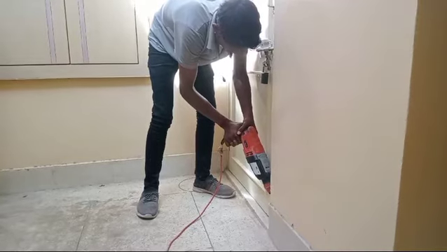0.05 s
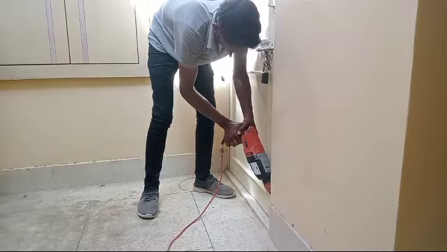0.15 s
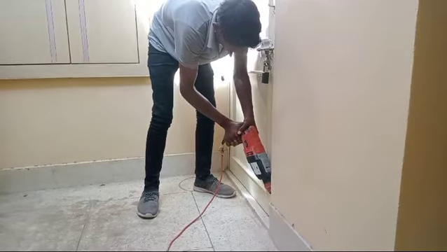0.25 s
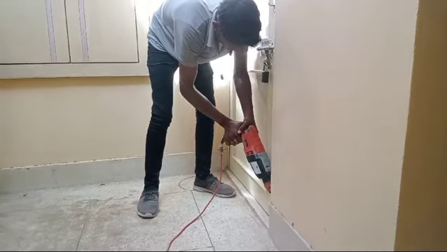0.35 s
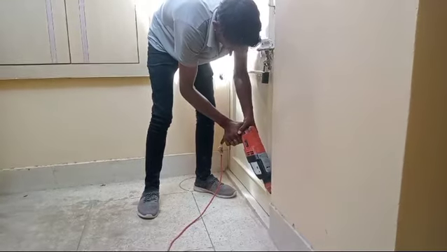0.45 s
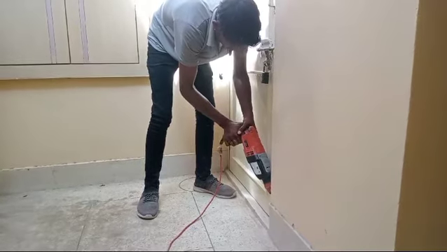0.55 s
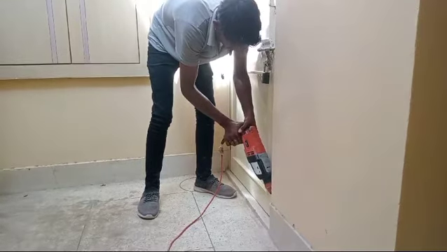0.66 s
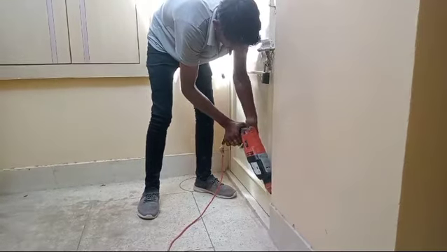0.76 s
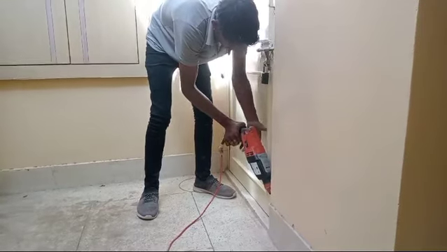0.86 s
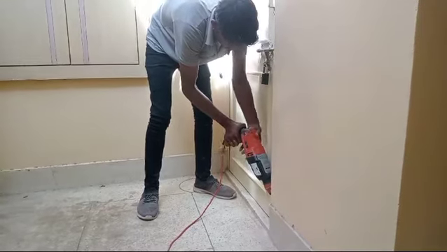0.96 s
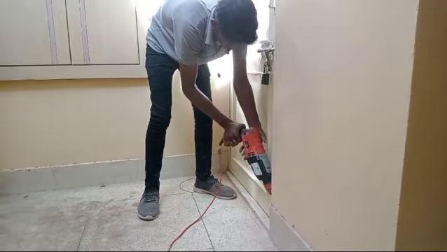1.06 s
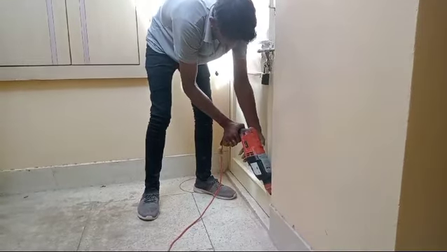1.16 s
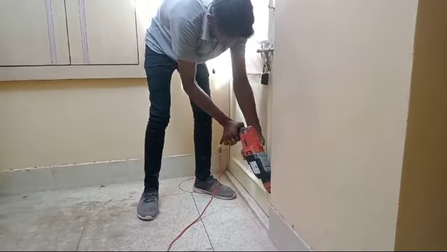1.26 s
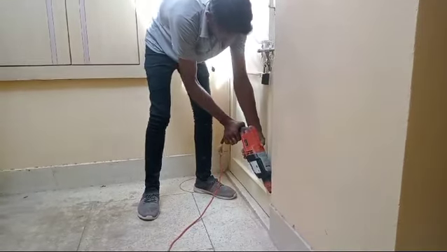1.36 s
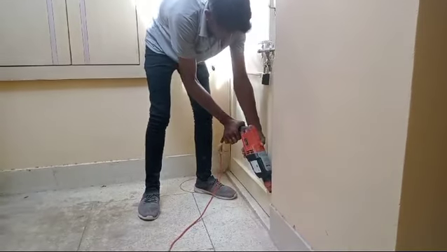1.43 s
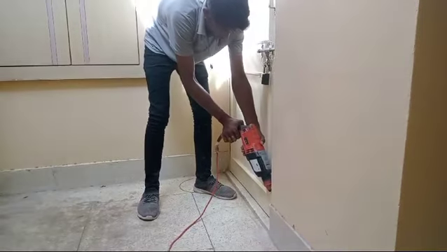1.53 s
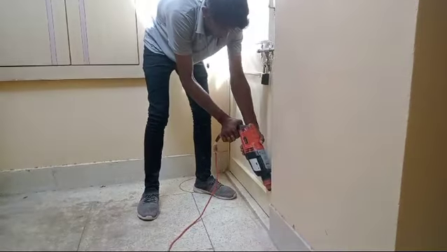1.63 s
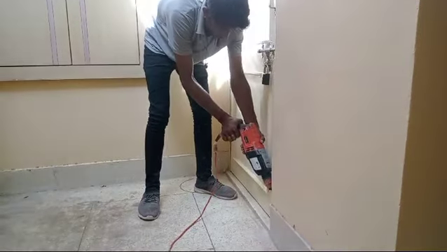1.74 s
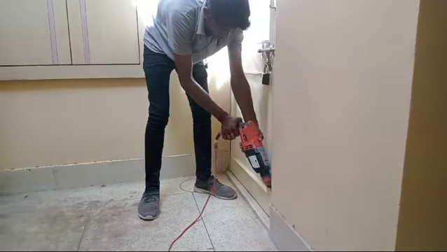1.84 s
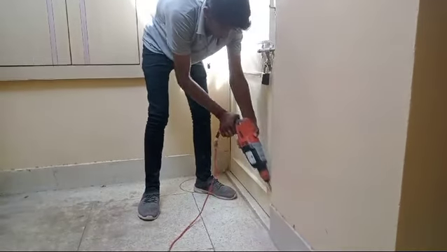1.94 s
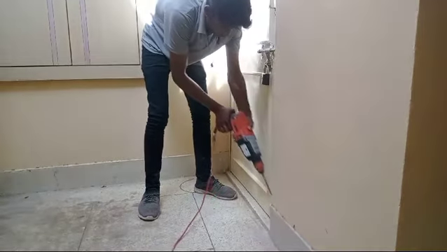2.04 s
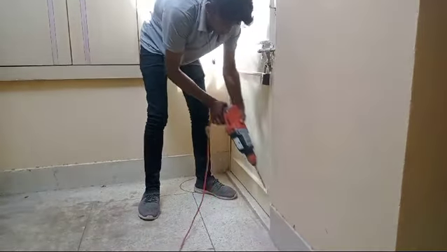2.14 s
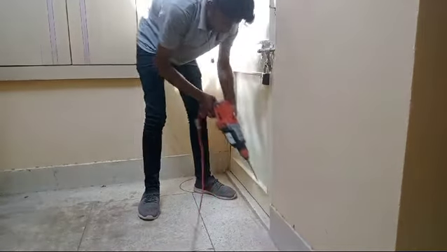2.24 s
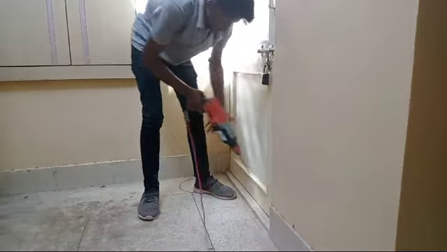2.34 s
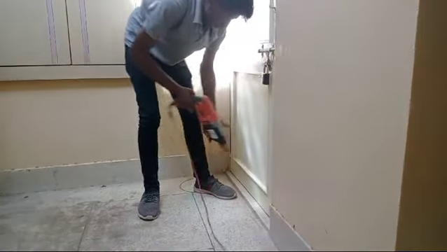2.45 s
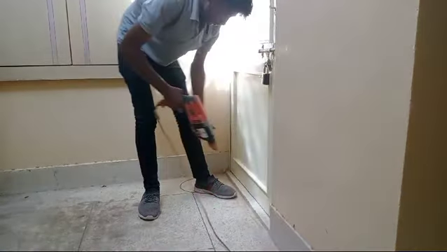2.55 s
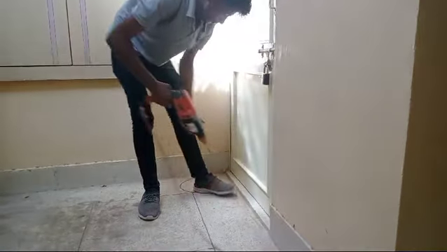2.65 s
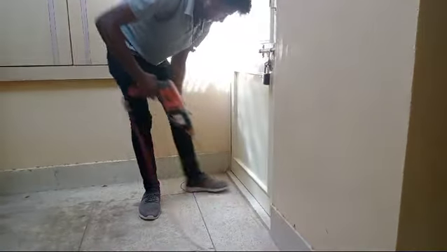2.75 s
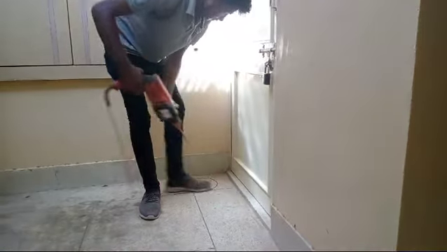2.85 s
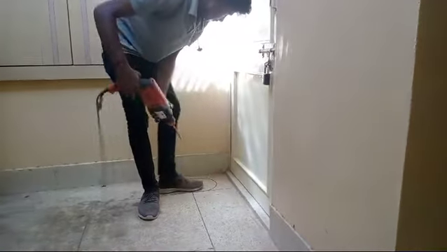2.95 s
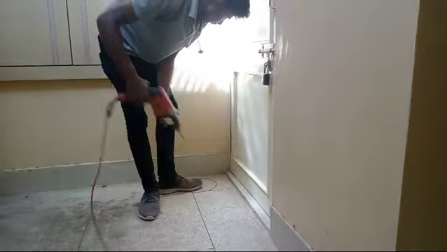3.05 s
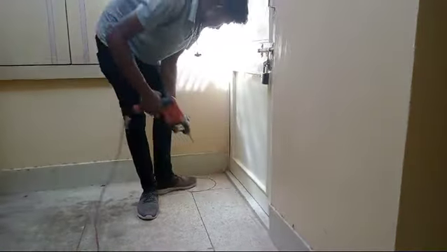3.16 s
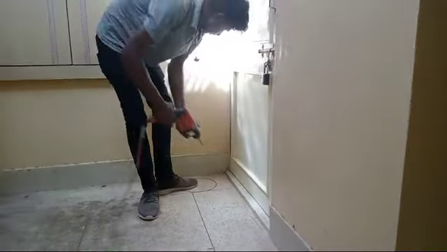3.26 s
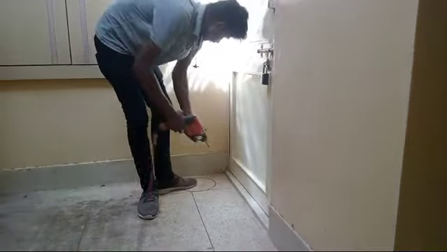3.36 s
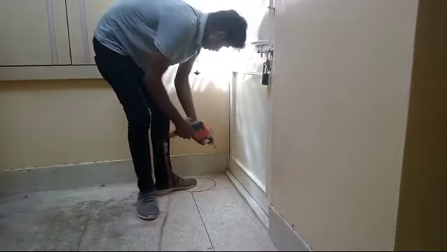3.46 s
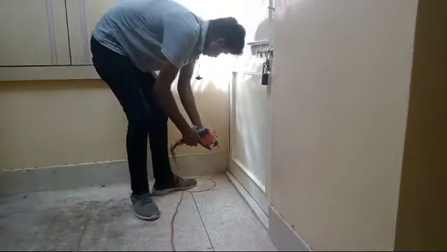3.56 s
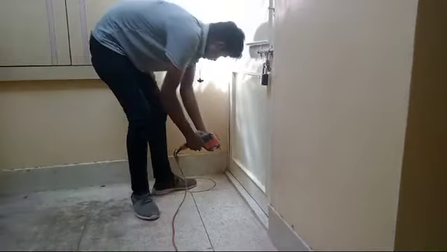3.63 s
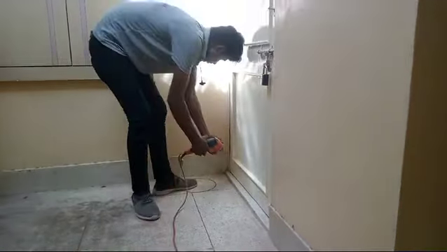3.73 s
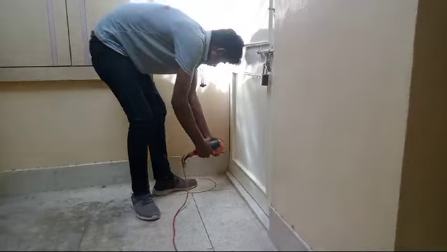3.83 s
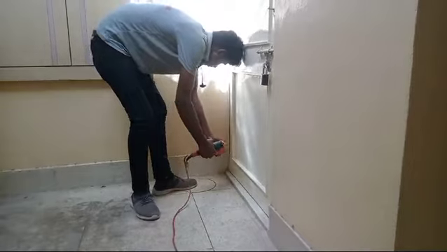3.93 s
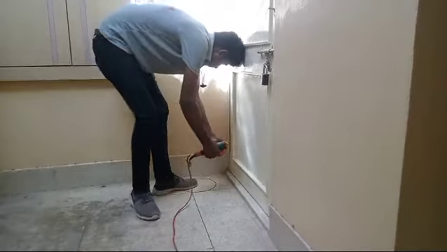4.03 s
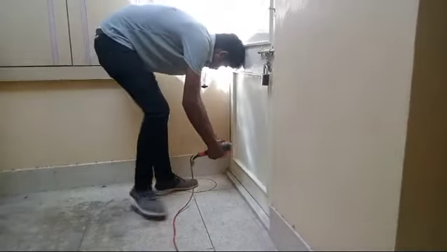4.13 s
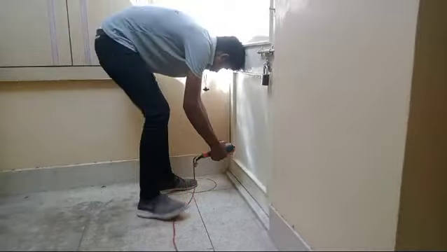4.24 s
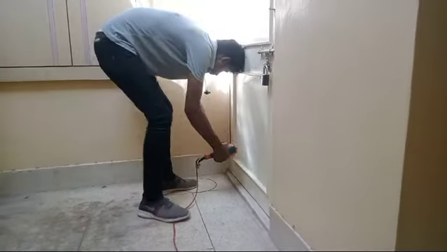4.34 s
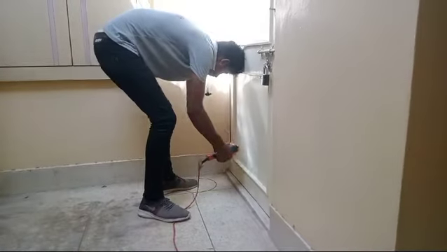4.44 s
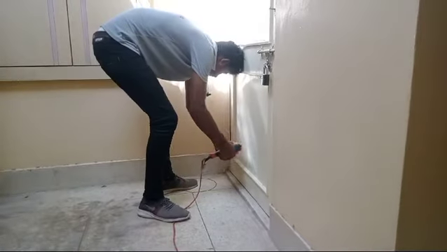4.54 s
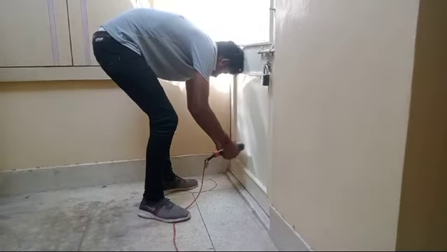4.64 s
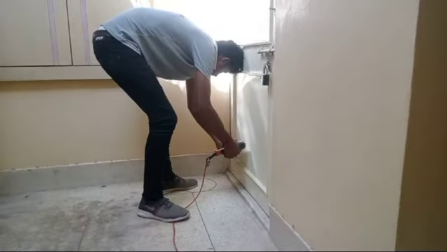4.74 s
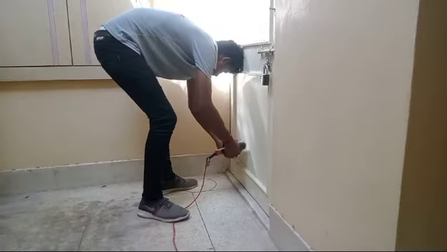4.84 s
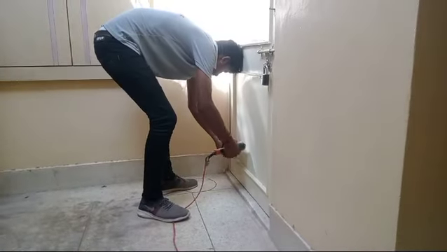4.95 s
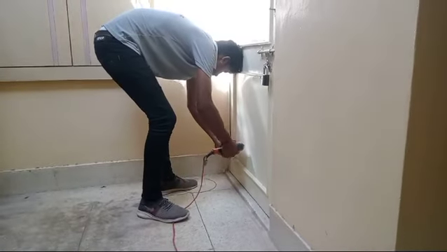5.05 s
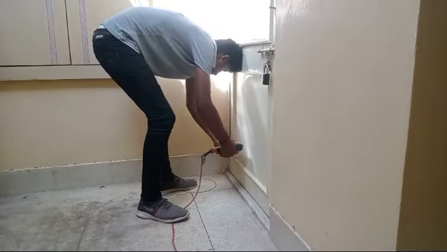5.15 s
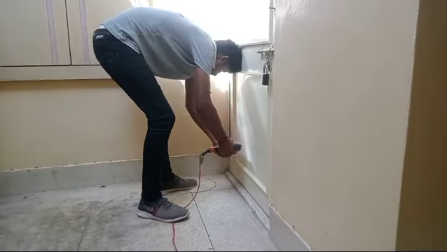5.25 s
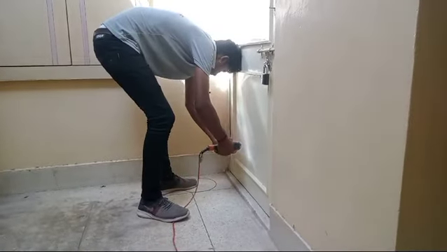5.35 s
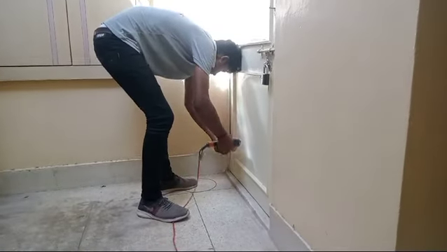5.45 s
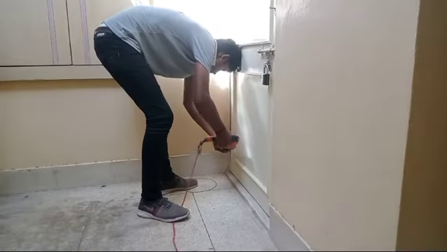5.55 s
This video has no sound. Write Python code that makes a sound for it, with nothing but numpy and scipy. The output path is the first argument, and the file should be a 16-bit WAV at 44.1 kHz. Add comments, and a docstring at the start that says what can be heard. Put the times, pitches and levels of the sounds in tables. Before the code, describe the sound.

A corded hammer drill works close by in a small, bare, hard-walled room. From the start it gives a loud, harsh mid-range roar, shaken by around sixty blows a second, with grinding hiss and a metallic chuck rattle. Around 0.9 s it eases and sags, then by 1.3 s surges back with a growl and a wavering motor whine until about 2.1 s. The trigger is released near 2 s; the roar coasts down unevenly, with a brief bump at 2.5 s, and sinks away by 3.5 s. A low machine hum with airy noise and faint whistle remains, with small clicks at about 3.2, 4.4 and 4.5 s and a gritty shoe scuff near 3.6 s. At 4.5 s the drill restarts, separate hard knocks merging into a brighter, faster hammering roar. High bit ringing and low jolts join after 5.2 s; it ends still running. The small microphone sounds thin in the bass.

```python
"""A corded hammer drill bores into a tiled floor in a small bare room, coasts down twice, rests, starts again.
Under the roar: a machine's hum, filling the pause with small clicks and scuffs.
The roar is noise in five bands, shaken by blows whose rate heads for as much as 78.5 a second.
Blows also ring the bit and drive slab resonances; a motor-like whine, jolts and sparse room echoes are added."""
import sys
import numpy as np
from scipy import signal
from scipy.fft import rfft, irfft, next_fast_len
from scipy.io import wavfile
from scipy.ndimage import uniform_filter1d

SR = 44100
rng = np.random.default_rng(int(sys.argv[2]) if len(sys.argv) > 2 else 0)


def master(y):
    """Save y as 16-bit WAV."""
    cut = np.clip(np.atleast_2d(y).T, -1, 1)
    pcm = np.round(cut * 32767)  # scale
    wavfile.write(sys.argv[1], SR, pcm.astype(np.int16))


def level_to_linear(level):
    """Convert decibel levels to linear amplitude factors, elementwise."""
    exponent = np.asarray(level, float) / 20
    return 10 ** exponent


N = 246519
T = np.arange(N) / SR

# Hum level. Each row: time in seconds, level in dB.
HUM_LEVEL = [(0, -50), (1.4, -49.5), (1.6, -54), (2.2, -49.5), (2.44, -50), (2.48, -42), (3.5, -40),
             (4.1, -39.5), (4.6, -40.5), (4.9, -51), (5.59, -45)]
# Hum partials. Each row: multiple of the hum frequency, level over the hum in dB.
HUM_PARTIALS = [(1, 0), (1.5, -19), (2, -8), (3.32, -13), (4, -18), (5, -17)]
# Background air noise spectrum. Each row: frequency in Hz, relative density in dB per Hz.
AIR_SPECTRUM = [(25, -5), (60, -9), (120, -5.5), (300, -0.5), (600, -4), (1200, -10.5), (2000, -6),
                (2600, -5), (3000, -14), (4000, -11.5), (4700, -21), (6200, -28.5), (7200, -27),
                (8500, -35), (9500, -41.5), (15500, -48)]

# Shoe on grit. Each row: start in seconds, end in seconds, level in dB.
SHOE_SCUFFS = [(3.53, 3.78, -44)]
# Grit spectrum. Each row: frequency in Hz, relative density in dB per Hz.
GRIT_SPECTRUM = [(1760, -36), (3000, -12), (4030, -5), (4660, -16), (7690, -19), (9650, -27), (15500, -30)]
# Faint treble rustles. Each row: start in seconds, end in seconds, level in dB.
TREBLE_RUSTLES = [(3.26, 3.34, -61), (4.13, 4.3, -71), (4.34, 4.46, -66)]
# Rustle spectrum. Each row: frequency in Hz, relative density in dB per Hz.
RUSTLE_SPECTRUM = [(5000, -30), (8000, -3), (12000, -2), (15500, -7)]
# Trigger and cable. Each row: start in seconds, relative level in dB,
# spectrum value at 3500 Hz in dB, t60 in seconds.
SNAPS = [(3.1587, -21, -4, 0.05), (3.288, -29, 3, 0.08), (3.5194, -48, 10, 0.08), (4.361, -31, 1, 0.095),
         (4.5231, -18, -2, 0.098)]
# The bit breaks through. Each row: start in seconds, relative level in dB.
BREAKTHROUGHS = [(5.256, -24), (5.294, -18), (5.343, -15), (5.371, -11), (5.465, -19), (5.547, -16)]

# A wavering motor-like whine while the drill runs. Each row: time in seconds, frequency in Hz, level in dB.
MOTOR_WHINE = [(1.53, 350, -60), (1.57, 352, -36.5), (1.69, 351, -39), (1.74, 358, -50), (1.8, 356, -41),
               (1.91, 358, -39), (1.94, 342, -37), (2.12, 346.6, -39.5), (2.15, 346, -60)]
# Slab and room resonances. Each row: frequency in Hz, width in Hz, level over the roar in dB.
SLAB_MODES = [(125.5, 8, -29), (188, 8, -37), (251, 8, -41), (376, 10, -30), (225, 16, -32), (500, 20, -30),
              (700, 30, -26), (775, 30, -24), (930, 30, -22)]
# The bit sings. Each row: time in seconds, relative level in dB.
BIT_RING_LEVEL = [(5.12, -56), (5.25, -30), (5.41, -36), (5.59, -37)]
# The first strong blows as the drill restarts. Each row: time in seconds, relative level in dB.
RESTART_BLOWS = [(4.614, -4), (4.6384, 0), (4.673, 5), (4.69, 1), (4.728, -8), (4.769, 4), (4.8176, -3)]

# Trigger and pressure changes. Each row: time in seconds, blow rate headed for in Hz (0 = let go),
# blow force headed for, 0-1.
TRIGGER_CHANGES = [(0, 62.7, .6), (.92, 0, 0), (1.17, 73, .42), (1.97, 0, 0), (4.52, 78.5, .95),
                   (4.8, 78.5, .55), (5.3, 62, .6)]
# Casing roar, one table before the pause and one after. Each row: time in seconds, level in dB.
ROAR_LEVELS = [
    [(0, -15.5), (.4, -18.5), (.55, -16.5), (.7, -17.5), (.9, -17), (1.13, -22.5), (1.2, -21), (1.3, -16.5),
     (1.38, -15), (1.48, -17), (1.97, -17.5), (2.12, -21), (2.45, -25), (2.49, -18), (2.7, -22), (3.2, -30),
     (3.32, -36.5), (3.45, -42), (3.65, -40.5)],
    [(4.515, -60), (4.53, -33), (4.575, -26), (4.59, -19.5), (4.615, -15), (4.68, -15), (5.0, -13.5),
     (5.36, -13), (5.45, -16.5), (5.59, -15.5)],
]
# Push on the bit. Each row: time in seconds, load 0-1, floor drumming over its usual share in dB.
BIT_LOAD = [(0, 0.42, -10), (.6, 0.4, -12.5), (.85, .4, -10.5), (1.25, 0.47, -10.5), (1.42, 0.8, -13.5),
            (1.55, 1, -10.5), (2.0, 0.88, -11), (2.12, 0.7, -9), (2.25, 0.6, -13), (2.5, 0.5, -11.5),
            (3.5, 0.9, -11), (4.55, 0.4, -9), (4.65, .02, -15), (4.75, 0, -15.5), (4.8, 0.34, -11),
            (5.15, 0.35, -11.5), (5.3, 0.58, -9), (5.59, .55, -11)]
# Bit clear of the floor. Each row: time in seconds, clearance 0-1.
BIT_LIFT = [(0, 0.1), (2.0, 0.07), (2.3, 0.5), (3.6, 0.9), (4.5, 0.3), (5.59, 0.8)]
# Drill spectrum. Each row: frequency in Hz, relative density in dB per Hz.
DRILL_SPECTRUM = [(120, -38), (200, -23.5), (300, -17.5), (400, -15.5), (600, -9.5), (930, -6),
                  (1100, -7.5), (1550, -4.5), (1850, -1), (2200, 2.5), (2550, -2), (3000, -9.5), (3650, -1),
                  (4250, -5.5), (4800, -14.5), (5600, -19.5), (7200, -16), (8500, -22.5), (9500, -26.5),
                  (16000, -35)]
# Casing spectrum with the bit clear. Each row: frequency in Hz, relative density in dB per Hz.
LIFTED_SPECTRUM = [(880, -34), (1500, -1), (1680, -11.5), (2110, 1.5), (2470, -1), (2830, -6.5), (3770, -3),
                   (4540, -14), (5200, -18), (6760, -49), (11400, -120)]
# Chuck rattle spectrum. Each row: frequency in Hz, relative density in dB per Hz.
RATTLE_SPECTRUM = [(9000, -8), (10500, -6), (12500, -6), (13400, -5.5), (14300, -10), (16000, -11)]
# The next five lists run low to high: floor drumming, growl, casing, grinding hiss, chuck rattle.
# Each entry: edge between neighbouring parts in Hz.
PART_EDGES_HZ = [1000, 1750, 4700, 9500]
# Each entry: share of the part that throbs with full-force blows, 0-1.
PART_BLOW_SHARE = [.25, .3, .35, .5, .8]
# Each entry: unloaded level over the roar in dB.
PART_BASE_DB = [-0.5, -14, -0.5, -11, -23.5]
# Each entry: level gained at full load in dB.
PART_LOAD_GAIN_DB = [-0.5, 10, 0, 0.5, 1]
# Each entry: rms of slow unevenness in dB.
PART_UNEVEN_DB = [0.7, 0.92, 0.34, 0.48, .8]
# Treble over its usual share. Each row: time in seconds, hiss in dB, rattle in dB.
TREBLE_SHIFT = [(0, -1, -5), (.35, 0.5, 2), (.55, -2, -3), (.8, 0.5, 2), (1.0, -1, -2), (1.15, -2.5, 1),
                (1.45, 0, -3.5), (1.95, 1.5, -2), (2.3, -2, -5.5), (2.8, -3, -7), (2.93, -2.5, -2),
                (3.15, -4, -7), (3.6, -5, -12), (4.52, -3, 6), (4.63, -0.5, -7), (4.8, 3, -3.5),
                (5.1, 0.5, -1.5), (5.59, -0.5, -0.5)]
# A chuck part sings and rattles. Each row: start in seconds, end in seconds, singing level in dB.
CHUCK_SPELLS = [(0, 0.134, -47), (0.25, 0.613, -52), (0.717, 0.908, -49), (1.04, 1.427, -56),
                (2.086, 2.333, -55), (2.467, 2.957, -62), (5.15, 5.7, -50)]

# Room decay. Each row: frequency in Hz, t60 in seconds.
ROOM_DECAY = [(200, 0.98), (1000, 0.4), (4000, 0.56), (12000, 0.51)]


def evened(x):
    """Scales to rms 1."""
    return x / np.sqrt(np.mean(x ** 2) + 1e-20)


def read(points, hz):
    """Looks a spectrum up on a log-frequency axis."""
    f, value = np.transpose(points)
    return np.interp(np.log(hz + 1), np.log(f + 1), value)


def curve(rows, column, off=-120):
    """One column over time; the value off outside its rows."""
    rows = np.array(rows)
    return np.interp(T, rows[:, 0], rows[:, column], off, off)


def joined(tables, column):
    """Highest value of one column over several tables."""
    return np.max([curve(table, column) for table in tables], axis=0)


def spell(start_s, end_s, edge_s):
    """Rises, holds at 1 and falls."""
    return np.clip(np.minimum(T - start_s, end_s - T) / edge_s, 0, 1)


def swells(rows):
    """Soft humps of level."""
    out = np.zeros(N)
    for start_s, end_s, db in rows:
        phase = np.clip((T - start_s) / (end_s - start_s), 0, 1)
        out += level_to_linear(db) * np.sin(np.pi * phase) ** 1.5
    return out


def colour(x, points, lo_hz=0, hi_hz=SR):
    """Filters x by a spectrum between two soft edges, then scales to rms 1."""
    size = next_fast_len(len(x))
    hz = np.fft.rfftfreq(size, 1 / SR) + 1
    edges = 1 / np.sqrt((1 + (lo_hz / hz) ** 24) * (1 + (hz / hi_hz) ** 24))
    shaped = rfft(x, size) * level_to_linear(read(points, hz)) * edges
    return evened(irfft(shaped, size)[:len(x)])


def wander(hz):
    """Low-passed noise of rms 1: slow chance up to hz."""
    lowpass = signal.butter(2, hz, fs=SR, output="sos")
    return evened(signal.sosfilt(lowpass, rng.standard_normal(N)))


def resonate(x, hz, width_hz):
    """A two-pole resonance, scaled to rms 1."""
    r = np.exp(-np.pi * width_hz / SR)
    return evened(signal.lfilter([1], [1, -2 * r * np.cos(2 * np.pi * hz / SR), r * r], x))


def decay(x, tau_s):
    """Each impulse dies exponentially."""
    return signal.lfilter([1], [1, -np.exp(-1 / (tau_s * SR))], x)


def background():
    """A distant machine hums; its air noise and a faint whistle rise and fall with it."""
    hum_hz, whistle_hz = 89, 1570
    hum = np.zeros(N)
    for order, db in HUM_PARTIALS:
        level = np.sqrt(2) * level_to_linear(db + 2.4 * wander(2.9))
        hum += level * np.sin(2 * np.pi * order * hum_hz * T + 0.3 * wander(6.2))
    air = level_to_linear(2 + .5 * wander(4.8)) * colour(rng.standard_normal(N), AIR_SPECTRUM)
    whistle = level_to_linear(-7.5) * resonate(rng.standard_normal(N), whistle_hz, width_hz=64)
    turns = np.cumsum(whistle_hz * (1 + .04 * wander(60))) / SR
    whistle += np.sqrt(2) * level_to_linear(-9 + 2.8 * wander(6.7)) * np.sin(2 * np.pi * turns)
    return level_to_linear(curve(HUM_LEVEL, column=1)) * (hum + air + whistle)


def scuffs():
    """Soft swells of gritty hiss, and fainter ones of treble only."""
    grit = rng.standard_normal(N) * level_to_linear(2.0 * wander(60))
    scuff = swells(SHOE_SCUFFS) * colour(grit, GRIT_SPECTRUM)
    return scuff + swells(TREBLE_RUSTLES) * colour(grit, RUSTLE_SPECTRUM)


def clicks():
    """Small plastic snaps: coloured noise dying exponentially."""
    out = np.zeros(N)
    for start_s, db, low_db, t60_s in SNAPS:
        part = out[round(start_s * SR):][:8000]
        spectrum = [(1500, -40), (3500, low_db), (6000, 1), (8000, 12), (13000, -12), (15500, -6)]
        snap = colour(rng.standard_normal(8000), spectrum)
        # noise peaks stand well over its rms
        part += level_to_linear(db - 21 - 60 * T[:8000] / t60_s) * snap
    return out


def jolts():
    """Low one-cycle pushes with a decaying swing back."""
    out, ms = np.zeros(N), np.arange(1500) / SR * 1000
    push = (1 - ms / 2) * ms * np.exp(1 - ms)
    for start_s, db in BREAKTHROUGHS:
        part = out[round(start_s * SR):][:len(push)]
        part += level_to_linear(db) * push[:len(part)]
    return out


def whine():
    """Two motor-like tones about an octave apart share one waver in pitch."""
    waver = 1 + .008 * wander(12)
    lower_turns = np.cumsum(curve(MOTOR_WHINE, column=1, off=350) * waver) / SR
    upper_turns = np.cumsum(678 * waver) / SR
    lower = level_to_linear(curve(MOTOR_WHINE, column=2)) * np.sin(2 * np.pi * lower_turns)
    upper_level = level_to_linear(-35 + 3.4 * wander(8.6)) * spell(1.52, 1.88, edge_s=.04)
    return np.sqrt(2) * (lower + upper_level * np.sin(2 * np.pi * upper_turns))


def slab(turns):
    """Slab and room answer harmonics of the blow rate, loud where they cross a resonance."""
    rate_hz, out = striker()[0][::64], np.zeros(N)
    for k in range(2, 17):
        gain = np.zeros(len(rate_hz))
        for hz, width_hz, db in SLAB_MODES:
            gain += level_to_linear(db) / (1 + (2 * (k * rate_hz - hz) / width_hz) ** 2)
        out += np.interp(T, T[::64], gain) * np.sin(2 * np.pi * (k * turns + rng.random()))
    return out * np.sqrt(2) * level_to_linear(joined(ROAR_LEVELS, column=1) + 2 * wander(5.5))


def bit_ring(blows):
    """Each blow sets a high mode of the bit ringing, with a short crack below it."""
    crack = colour(blows, [(9000, -40), (12000, -10), (15500, -7)])
    burst = decay(blows, tau_s=.002) * rng.standard_normal(N)
    ring = resonate(burst, hz=15480, width_hz=250)
    return level_to_linear(curve(BIT_RING_LEVEL, column=1)) * (1.1 * ring + .5 * crack)


def first_blows():
    """Separate knocks as the drill restarts: decaying noise in its colour."""
    train = np.zeros(N)
    for s, db in RESTART_BLOWS:
        train[round(s * SR)] = level_to_linear(db - 12.5)  # noise peaks stand over its rms
    return decay(train, tau_s=0.0066) * colour(rng.standard_normal(N), DRILL_SPECTRUM, lo_hz=880)


def striker():
    """Blow rate and force creep toward each new setting, fast under power and slowly when coasting."""
    spin_up_s, coast_s = .17, .82
    out, now = np.zeros((2, N)), np.array(TRIGGER_CHANGES[0][1:])
    ends_s = [row[0] for row in TRIGGER_CHANGES[1:]] + [N / SR]
    for (start_s, *goal), end_s in zip(TRIGGER_CHANGES, ends_s):
        on, goal = (T >= start_s) & (T < end_s), np.array(goal)
        tau_s = spin_up_s if goal[0] else coast_s
        fade = np.exp(-(T[on] - start_s) / tau_s)
        out[:, on] = goal[:, None] + (now - goal)[:, None] * fade
        now = out[:, on][:, -1]
    return out


def hammer():
    """Count of blows so far, and a train of blows of uneven size."""
    turns = np.cumsum(striker()[0] * (1 + .006 * wander(8))) / SR
    size = level_to_linear(2.2 * rng.standard_normal(600))[turns.astype(int)]
    return turns, (np.diff(np.floor(turns), prepend=0) > 0) * size


def drill(blows):
    """Gear and fan noise in five parts; each blow shakes them for about 9 ms, the high parts most."""
    force, load = striker()[1], curve(BIT_LOAD, column=1)
    lift = np.clip(curve(BIT_LIFT, column=1), 0, 1)
    shake = evened(decay(blows, tau_s=0.0094))
    roar_db = joined(ROAR_LEVELS, column=1)
    chuck = [(spell(start_s, end_s, edge_s=0.035), db) for start_s, end_s, db in CHUCK_SPELLS]
    edges_hz, out = [0, *PART_EDGES_HZ, SR], np.zeros(N)
    for k in range(5):
        lo_hz, hi_hz = edges_hz[k], edges_hz[k + 1]
        rel_db = PART_BASE_DB[k] + PART_LOAD_GAIN_DB[k] * load + PART_UNEVEN_DB[k] * wander(5.3)
        if k == 0:
            rel_db += curve(BIT_LOAD, column=2)
        if k > 2:
            rel_db += curve(TREBLE_SHIFT, column=k - 2)
        mix = np.clip(PART_BLOW_SHARE[k] * force, 0, 1)
        drive = rng.standard_normal(N) * (1 - mix + mix * shake) / np.sqrt(1 - mix + mix ** 2)
        drive *= level_to_linear(0.4 * wander(31))  # the load is uneven
        part = colour(drive, RATTLE_SPECTRUM if k == 4 else DRILL_SPECTRUM, lo_hz, hi_hz)
        if k == 2:  # unloaded, the casing rings a little higher
            part += lift * (colour(drive, LIFTED_SPECTRUM, lo_hz, hi_hz) - part)
        if k == 4:  # more rattle in each spell
            part *= level_to_linear(0.5 * sum(shape for shape, db in chuck))
        out += level_to_linear(roar_db + rel_db) * part
    # the rattle's drive also feeds a breathy band in the first half second and the singing chuck
    out += level_to_linear(roar_db - 31) * spell(-1, 0.5, edge_s=0.26) * resonate(drive, hz=13400, width_hz=900)
    sing_level = level_to_linear(roar_db - 47) + sum(level_to_linear(db) * shape for shape, db in chuck)
    return out + sing_level * resonate(drive, hz=11550, width_hz=220)


def shifting(x, patch_db):
    """The hand-held tool rocks, so its resonances swell and fade in patches."""
    hz, t, z = signal.stft(x, SR, nperseg=256)
    patches = uniform_filter1d(rng.standard_normal(z.shape), size=3, axis=0)
    patches = evened(uniform_filter1d(patches, size=16, axis=1))
    gain_db = patch_db * patches - np.log(10) / 20 * patch_db ** 2  # keeps mean power
    return signal.istft(z * level_to_linear(gain_db), SR, nperseg=256)[1][:N]


def room(x):
    """Sparse taps, each band dying at its own speed; three tails take turns steadily, so no echo
    colour stays fixed."""
    wet_db = -7.5
    at, wet = np.arange(150, SR - 20, 20), np.zeros(N)
    for k in range(3):
        taps = np.zeros(SR)
        taps[at + rng.integers(0, 20, len(at))] = rng.choice([-1., 1.], len(at))
        hz, t, z = signal.stft(taps, SR, nperseg=256)
        fade = level_to_linear(-60 * t / read(ROOM_DECAY, hz)[:, None])
        tail = signal.istft(z * fade, SR, nperseg=256)[1]
        turn = np.sqrt(2 / 3) * np.cos(np.pi * (6 * T + k / 3))
        wet += signal.fftconvolve(x * turn, tail / np.linalg.norm(tail))[:N]
    return (x + level_to_linear(wet_db) * wet) / np.sqrt(1 + level_to_linear(2 * wet_db))


def scene():
    """Drill and small sounds in the room, with slab, whine, jolts and background added."""
    turns, blows = hammer()
    near = shifting(drill(blows), patch_db=0.91) + first_blows() + bit_ring(blows) + clicks() + scuffs()
    return (room(near) + slab(turns) + whine() + jolts() + background())[None]


def top_cut(x):
    """Nothing passes above the cut-off."""
    return signal.sosfilt(signal.butter(12, 16520, fs=SR, output="sos"), x)


def record(dry):
    """A small microphone drops the deepest bass and rounds off the highest peaks; the top is cut off."""
    highpass = signal.butter(3, 55, "high", fs=SR, output="sos")
    thin = signal.sosfilt(highpass, dry)
    rounded = thin / (1 + abs(thin / .97) ** 6) ** (1 / 6)
    lowpass = signal.firwin(801, 15500, window=("kaiser", 10), fs=SR)
    finished = signal.oaconvolve(rounded, lowpass[None], "same")
    return top_cut(finished)


dry = scene()
out = record(dry)
master(out)
```